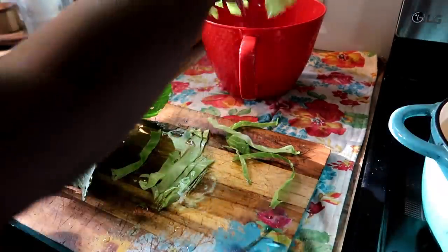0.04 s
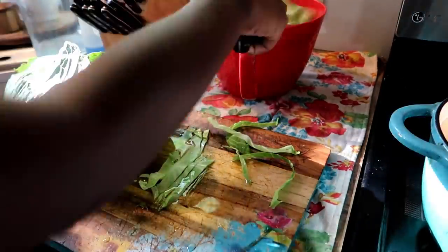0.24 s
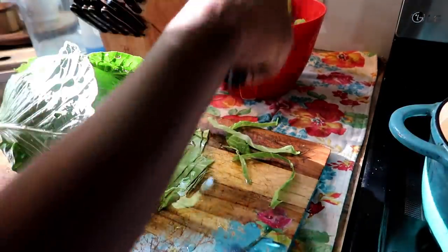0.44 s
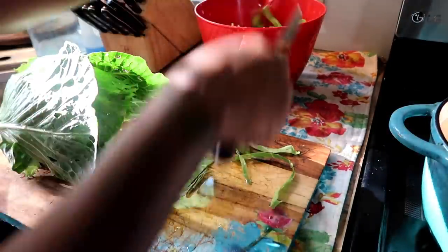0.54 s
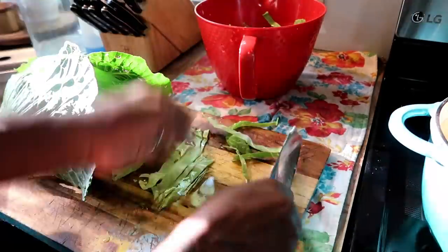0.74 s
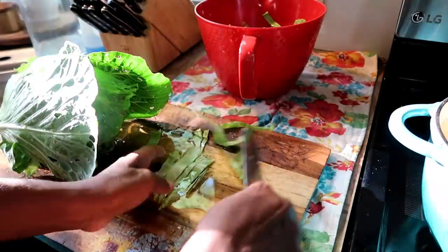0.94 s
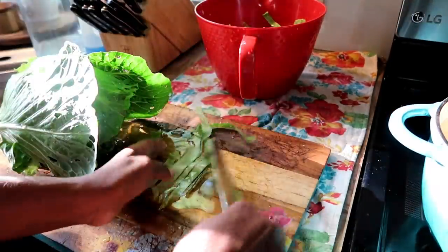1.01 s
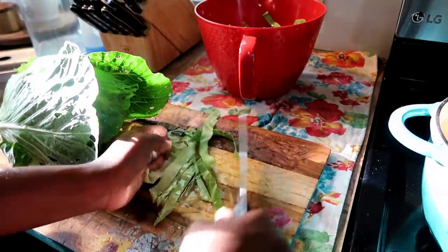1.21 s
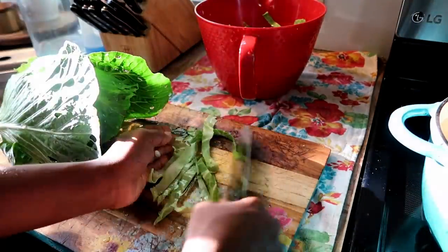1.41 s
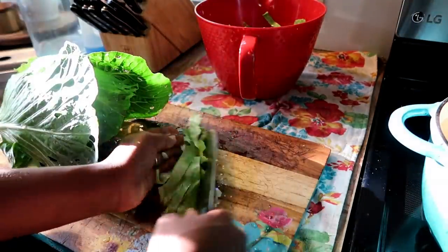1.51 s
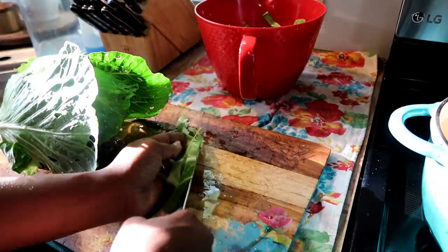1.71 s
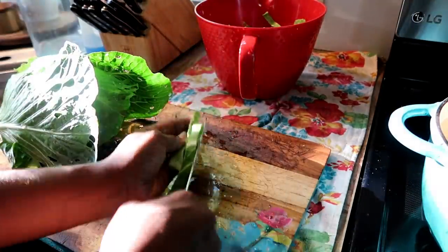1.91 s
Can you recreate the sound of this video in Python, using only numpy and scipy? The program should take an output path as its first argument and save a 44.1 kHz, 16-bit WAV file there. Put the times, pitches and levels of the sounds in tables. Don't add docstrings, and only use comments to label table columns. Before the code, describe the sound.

Knife chopping greens on a wooden board after a clattering bowl knock, in a small kitchen

```python
import sys
import numpy as np
from scipy import signal
from scipy.fft import rfft, irfft
from scipy.io import wavfile
from scipy.ndimage import uniform_filter1d

SR = 44100
rng = np.random.default_rng(int(sys.argv[2]) if len(sys.argv) > 2 else 0)


def unload_wav(signal):
    wavfile.write(
        sys.argv[1],
        SR,
        np.round(np.clip(np.atleast_2d(signal).T, -1, 1) * 32767).astype(np.int16),
    )


def invert_db(level):
    return 10 ** (np.asarray(level, dtype=float) / 20)


N = 85995
BODY_S = 0.3


def curve(table):
    t, db = np.array(table).T
    return invert_db(np.interp(np.arange(N) / SR, t, db))


def colour(x, points):
    hz = np.fft.rfftfreq(N, 1 / SR) + 1
    point_hz, point_db = np.array(points).T
    y = irfft(rfft(x) * invert_db(np.interp(np.log(hz), np.log(point_hz), point_db)), N)
    return y / np.sqrt(np.mean(y ** 2))


def walk(rate_hz):
    k = int(SR / rate_hz)
    steps = np.repeat(rng.standard_normal(N // k + 1), k)
    return 5.6 * uniform_filter1d(uniform_filter1d(steps, k), k)[:N]


def grains(rate_hz, spread_db):
    chance, sign, size = rng.random((3, N))
    return (chance < rate_hz / SR) * np.sign(sign - .5) * invert_db(-spread_db * np.log(size + 1e-9))


def highpass(x, hz, order=2):
    return signal.sosfilt(signal.butter(order, hz, "high", fs=SR, output="sos"), x)


def body(modes):
    rough, spot_db, waver_hz = .7, 2., 200
    t = np.arange(int(SR * BODY_S)) / SR
    hz, db, t60 = np.array(modes).T[:, :, None]
    knots = rng.standard_normal((len(modes), 2, 101))
    waver = np.array([np.interp(t * waver_hz, np.arange(101), a + 1j * b) for a, b in knots])
    waver = 1 + rough * np.clip(hz / 1500, 0, 1) * waver * np.minimum(t * waver_hz, 1)
    spot = spot_db * np.clip(hz / 1000, 0, 1) * knots[:, 0, -1:]
    gain = invert_db(db + spot - 60 * t / np.maximum(t60, .004))
    alternate = (-1) ** np.arange(len(modes))[:, None]
    sign = np.where(hz > SR / 55, alternate, 1)
    return sign * gain * np.imag(waver * np.exp(2j * np.pi * hz * t))


def struck(hits, modes, crack_db, choke_s=0):
    crack_fade_s, damped_t60_s = 0.0059, 0.033
    out, t = np.zeros(N + SR), np.arange(2000) / SR
    long = np.arange(int(SR * BODY_S) + 1999) / SR
    crack_band = signal.butter(2, [308, 5250], "band", fs=SR, output="sos")
    for s, db, ms in hits:
        u = t / (max(ms, .03) / 1000)
        push = u * np.exp(-2 * u)
        sound = signal.fftconvolve(body(modes).sum(axis=0), push / push.sum())
        if choke_s > 0:
            damped_s = np.clip(long + min(s - choke_s, 0), 0, 1)
            sound *= invert_db(-60 * damped_s / damped_t60_s)
        crack = signal.sosfilt(crack_band, np.exp(-t / crack_fade_s) * rng.standard_normal(len(t)))
        sound[:len(t)] += invert_db(crack_db) * crack / (1 + (ms / 0.15) ** 2)
        start = int(s * SR)
        out[start:start + len(sound)] += invert_db(db) * sound
    return out[:N]


def rubbed(modes, rate_hz, patch_db):
    y = 0
    for mode in body(modes):
        catches = grains(rate_hz, 1.9) * invert_db(patch_db * walk(24.75))
        y = y + signal.fftconvolve(catches, mode)[:N]
    return y / np.std(y)


def wide(hz):
    return np.clip(hz / 3600, .08, .4)


# [f/Hz, level/dB]
KITCHEN_COLOUR = [(12, -37), (20, 8.5), (59, -0.5), (189, -9.5), (229, -2.5), (603, -17), (940, -21),
                  (11500, -46), (13500, -81)]


def kitchen():
    kitchen_db = -43.5
    whine_hz, whine_db, whine_right = 12800, -58, -.43
    pulse_hz, pulse_start_s, pulse_duty = 25, .002, .72
    t = np.arange(N) / SR
    mid = colour(rng.standard_normal(N), KITCHEN_COLOUR) * invert_db(.4 * walk(9))
    side_colour = [(hz, db + 20 * np.log10(wide(hz))) for hz, db in KITCHEN_COLOUR]
    side = colour(rng.standard_normal(N), side_colour) * invert_db(-10.0)
    gate = uniform_filter1d(1. * ((t - pulse_start_s) * pulse_hz % 1 < pulse_duty), size=150)
    whine = invert_db(whine_db) * gate * np.sin(2 * np.pi * whine_hz * t)
    return invert_db(kitchen_db) * np.array([mid + side, mid - side]) + whine * np.array([[1], [whine_right]])


# [f/Hz, early level/dB, early t60/s, late level/dB, late t60/s]
WALLS = [(99.4, -21, 0.17, -11.5, 0.49), (175, -52, 0.5, -65, 0.85), (370, -8, 0.79, -38, 0.91),
         (810, -6.5, 0.23, -23.5, 0.53), (1580, -12.5, 0.36, -11, 0.61), (2800, -3.5, 0.23, -14, 0.86),
         (5300, -8.5, 0.38, -57, 0.23), (11100, 2, 0.076, -55, 0.245)]


def room(x):
    gap_s = 0.00077
    t = np.arange(SR) / SR
    f = np.fft.rfftfreq(SR, 1 / SR) + 1
    answer = np.zeros((2, SR))
    for hz, early_db, early_t60, late_db, late_t60 in WALLS:
        octave = np.exp(-np.log2(f / hz) ** 2 * 2)
        band = irfft(rfft(rng.standard_normal((2, SR))) * octave, SR)
        early = invert_db(early_db - 60 * t / early_t60) / np.sqrt(early_t60 * SR / 14)
        late = invert_db(late_db - 60 * t / late_t60) / np.sqrt(late_t60 * SR / 14)
        answer += band * (early + late) * (1 - np.exp(-t / gap_s)) * np.array([[1], [wide(hz)]])
    mid, side = signal.fftconvolve(x[None], answer, axes=1)[:, :N]
    return np.array([mid + side, mid - side])


# [t/s, level/dB, fade/ms, centre f/Hz]
RIB_CRUNCHES = [(0.015, -37, 2.7, 3000), (0.1011, -33.5, 7.7, 3430), (0.125, -36, 6.8, 5250),
                (0.142, -39.5, 9.5, 3500), (0.4, -38, 4, 1480), (0.41, -36, 10, 3240),
                (1.02, -39, 6.4, 6000), (1.034, -56, 3.2, 3040), (1.089, -39, 7.9, 4410),
                (1.537, -44, 3.7, 5060), (1.602, -36.5, 3.5, 6940), (1.605, -35, 4.3, 4030),
                (1.625, -36, 6.3, 4000), (1.633, -32, 3.2, 3480), (1.646, -48, 5.3, 2990),
                (1.739, -42, 1.4, 6000)]


def crunches():
    t, out = np.arange(N) / SR, 0
    for s, db, ms, hz in RIB_CRUNCHES:
        tone = [(hz * 2 ** (k * 1.16), -12 * k * k) for k in (-2, -1, 0, 1, 2)]
        fade = (t >= s) * np.exp(-np.abs(t - s) * 1000 / ms)
        out = out + invert_db(db) * fade * colour(grains(8000, 3.4), tone)
    return out


# [t/s, level/dB]
LEAF_STIR = [(0, -46), (.092, -44.5), (.11, -38.5), (.15, -41.5), (.23, -44), (.3, -27.5), (.45, -44),
             (.55, -57), (.9, -77.5), (1.2, -88), (1.45, -49.5), (1.58, -39.5), (1.63, -37.5),
             (1.68, -45.5), (1.72, -52), (1.745, -45), (1.8, -60), (1.95, -68)]
# [f/Hz, level/dB]
LEAF_TONE = [(88, -43.5), (150, 10), (495, -1), (936, -2), (1320, -1), (4120, -9), (10800, -24),
             (13100, -21), (15000, -98)]


def leaves():
    stir = curve(LEAF_STIR) * invert_db(0.38 * walk(120))
    return stir * colour(grains(9000, 0.91), LEAF_TONE) + crunches()


# [t/s, level/dB, contact/ms]
BOARD_TAPS = [
    (1.513, -16, 0.97),
    (1.526, -36, 0.24),
    (1.536, -11, 0.45),
    (1.548, -17, 0.74),
    (1.557, -20, 0.18),
    (1.602, -18, 0.97),
    (1.7205, -22.5, 0.72),
    (1.73, -22, 0.66),
    (1.742, -37.5, 0.44),
]
# [f/Hz, level/dB, t60/s]
ROCKING_MODES = [(263.4, -7.5, 0.28), (341, -15.5, 0.054), (513, 5, 0.04), (600, 0.5, 0.0075),
                 (1137, -26, 0.056), (2360, -14, .02)]


def board_taps():
    return struck(BOARD_TAPS, ROCKING_MODES, -12)


# [t/s, level/dB, contact/ms]
RIM_TICKS = [
    (1.607, -33, 0.13),
    (1.628, -30.5, 0.024),
    (1.741, -46, 0.055),
    (1.79, -34.5, 0.098),
    (1.9, -37.5, 0.24),
]
# [f/Hz, level/dB, t60/s]
TICK_MODES = [(891.6, -6, 0.16), (1117, -2.5, 0.19), (2330, 4, 0.031), (3600, -19, .02)]


def blade_ticks():
    return struck(RIM_TICKS, TICK_MODES, -15.5)


# [t/s, level/dB]
DRAG = [(.85, -100), (.89, -45.5), (.97, -47.5), (1.0, -38.5), (1.04, -39), (1.09, -43), (1.13, -54),
        (1.2, -58), (1.27, -100)]
# [f/Hz, level/dB]
DRAG_TONE = [(180, -68), (300, -1), (1820, -17.5), (2040, -12.5), (3790, -23.5), (6510, -21.5),
             (11400, -29), (14300, -28), (15000, -78)]
# [t/s, level/dB]
BOARD_SHUDDER = [(0, -29.5), (.16, -43.5), (.24, -46), (.95, -96.5), (.995, -23), (1.04, -29.5),
                 (1.09, -31), (1.17, -74), (1.25, -104)]
# [f/Hz, level/dB, t60/s]
COUNTER_MODES = [(82, -3.5, 0.05), (108, 6.5, 0.04), (149.8, -5, 0.12), (225, -4.5, 0.054),
                 (376, -5.5, 0.033), (496, -2.5, 0.021)]


def scrape():
    rasp = colour(grains(6000, 2.0) * invert_db(0.96 * walk(69.78)), DRAG_TONE)
    shudder = rubbed(COUNTER_MODES, 600, .8)
    return curve(DRAG) * invert_db(6) * rasp + curve(BOARD_SHUDDER) * shudder


# [middle t/s, length/s, f/Hz, level/dB]
BLADE_SINGS = [(0.91, 0.054, 4560, -51), (1.153, 0.094, 2500, -63), (1.0, 0.069, 4600, -43),
               (0.922, 0.037, 4060, -47), (0.949, 0.044, 4610, -49), (1.02, 0.099, 6300, -49.5),
               (1.06, .03, 4050, -53), (1.028, 0.02, 6370, -36.5), (0.95, 0.048, 5260, -50),
               (0.93, 0.052, 4575, -48), (1.055, 0.07, 4260, -45), (1.065, 0.033, 6800, -46),
               (0.8234, 0.025, 4580, -35), (.83, 0.021, 5400, -57), (1.08, 0.042, 3445, -46),
               (1.095, 0.038, 4580, -43), (1.11, 0.028, 4205, -46), (1.5, 0.033, 1990, -67),
               (1.1, 0.078, 2020, -46), (1.028, 0.14, 1130, -38), (1.065, 0.15, 1490, -44.5)]


def blade():
    rough, waver_hz = .15, 120
    t, out = np.arange(N) / SR, 0
    for s, length, hz, db in BLADE_SINGS:
        catch = 1 + rough * (walk(waver_hz) + 1j * walk(waver_hz))
        swell = np.exp(-(2 * (t - s) / length) ** 2)
        out = out + invert_db(db) * swell * np.imag(catch * np.exp(2j * np.pi * hz * t))
    return out


# [t/s, level/dB, contact/ms]
MIDDLE_SLAPS = [
    (.808, -25, 0.24),
    (.8105, 2, 0.13),
    (.8117, -2, 0.2),
    (.822, 3.5, 0.65),
]
# [f/Hz, level/dB, t60/s]
MIDDLE_MODES = [(416, -10, 0.09), (618.6, -10.5, 0.14), (729, 6.5, 0.0084), (970, 6, 0.016),
                (1110, 12.5, 0.0092), (1284, 12.5, 0.015), (1589, 0.5, 0.021), (2002, -3.5, 0.019),
                (2300, -3, 0.017), (3170, -1, 0.015), (3520, -8, 0.041), (4570, -25.5, 0.13),
                (5860, -54, 0.041), (6460, -24.5, 0.21)]
# [t/s, level/dB, contact/ms]
EDGE_SLAPS = [
    (1.398, -41, 0.16),
    (1.4058, 7.5, 0.16),
    (1.4085, -31, 0.086),
    (1.421, -29, 0.52),
    (1.432, -19, .3),
    (1.445, -8.5, 0.3),
    (1.466, -21, 0.43),
]
# [f/Hz, level/dB, t60/s]
EDGE_MODES = [(535, -10.5, 0.12), (748, 5.5, 0.028), (335, -35, 0.035), (1058, -15, 0.24),
              (1230, 15, 0.011), (1647, -10.5, 0.047), (2102, -13, 0.088), (2460, -10, 0.014),
              (3110, -2, 0.0069), (4390, -7, 0.02), (5600, -17.5, 0.019)]


def board_slaps():
    middle = invert_db(-8.5) * highpass(struck(MIDDLE_SLAPS, MIDDLE_MODES, -0.44), 160)
    edge = invert_db(-9.0) * highpass(struck(EDGE_SLAPS, EDGE_MODES, -8.5), 160, order=1)
    return middle + edge


# [t/s, level/dB, contact/ms]
COUNTER_THUMPS = [
    (.011, -30, 0.37),
    (.242, -11.5, 0.5),
    (.283, 2.5, 0.16),
    (.304, -9.5, 1.56),
    (.545, -48, 6.),
]
# [f/Hz, level/dB, t60/s]
BOWL_MODES = [(62.1, -43, .3), (99.4, -19.5, 0.26), (137, 4.5, 0.11), (162, -3, 0.082), (222, -25.5, 0.61),
              (371, -27.5, 0.46)]


def bowl_thumps():
    return struck(COUNTER_THUMPS, BOWL_MODES, 0)


# [t/s, level/dB, contact/ms]
KNIFE_KNOCKS = [
    (.2415, 9, 0.17),
    (.2475, -2.5, 0.17),
    (.259, 5, 0.2),
    (.272, -10.5, 0.22),
    (.2765, -3.5, 0.12),
    (.2795, -0.5, 0.044),
    (.308, 3.5, 0.99),
    (.355, -41, 0.24),
]
# [f/Hz, level/dB, t60/s]
RIM_MODES = [(495, -5, 0.21), (575, -0.5, 0.031), (1088, -9.5, 0.36), (1540, -7, 0.029),
             (304.4, -9.5, 0.031), (2387, -7, 0.18), (2552, -7, 0.19), (2860, 1, 0.02), (3654, -6.5, 0.025),
             (4535, -1, 0.041), (6220, -3.5, 0.06)]


def bowl_rim():
    knocks = struck(KNIFE_KNOCKS, RIM_MODES, 4.5, choke_s=.282)
    return invert_db(-8.5) * highpass(knocks, 160)


def phone_ports(left, right):
    lag_s, turn_hz, steep, turn_rad = 8e-6, 7400, 11, 2.4
    pan_db, pan_hz = 2.6, 1280
    peak_hz, peak_db, top_hz, top_db = 11150, 8, 11800, -3
    hz = np.fft.rfftfreq(N, 1 / SR) + 1
    turn = 2 * np.pi * hz * lag_s + turn_rad / (1 + (turn_hz / hz) ** steep)
    pan = invert_db(pan_db / 2 * np.exp(-np.log2(hz / pan_hz) ** 2))
    peak = peak_db * np.exp(-np.log2(hz / peak_hz) ** 2 * 4)
    bright = invert_db(peak + top_db / (1 + (top_hz / hz) ** 20))
    ports = np.array([rfft(left) * pan, rfft(right) * np.exp(-1j * turn) / pan])
    return irfft(ports * bright, N)


def scene():
    ringing = bowl_rim()
    near = board_slaps()
    near = near + invert_db(-4.5) * (bowl_thumps() + highpass(board_taps() + blade_ticks(), 160))
    near = near + scrape() + leaves()
    ringing = ringing + blade()
    left, right = near + ringing + room(near + invert_db(-8) * ringing)
    return phone_ports(left, right) + kitchen()


def roll_off(x):
    return signal.sosfilt(signal.butter(12, 15510, fs=SR, output="sos"), x)


def record(dry):
    thin = highpass(dry, 51.7)
    mix = np.clip(thin, -1., 1.)
    return roll_off(mix)


dry = scene()
out = record(dry)
unload_wav(out)
```